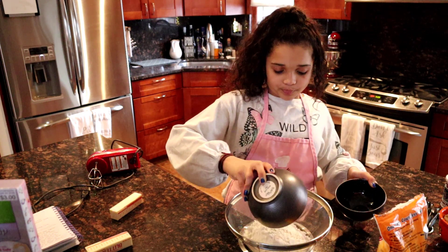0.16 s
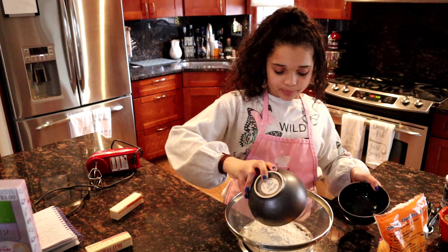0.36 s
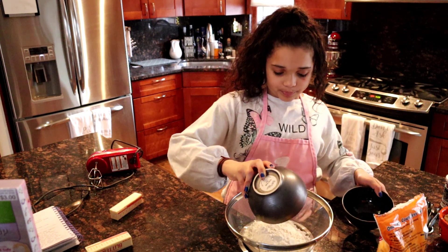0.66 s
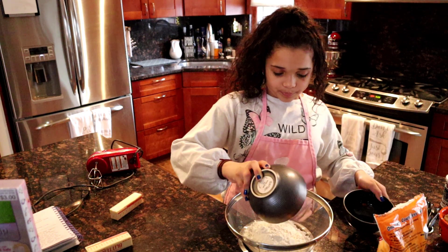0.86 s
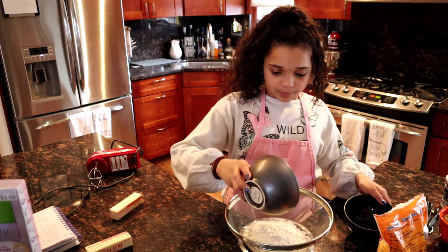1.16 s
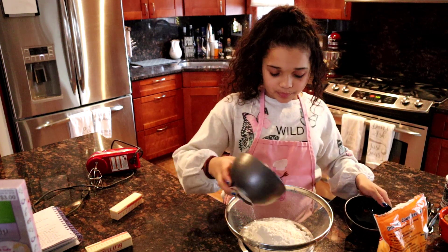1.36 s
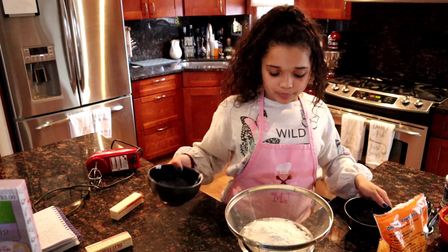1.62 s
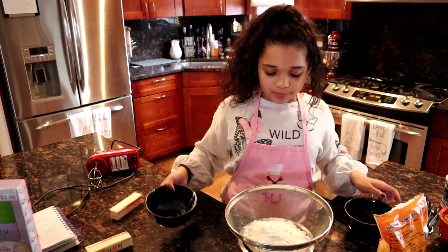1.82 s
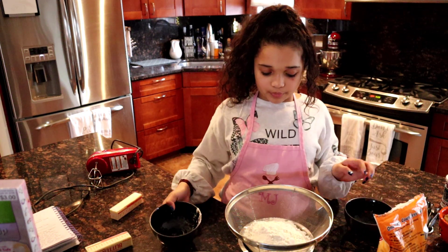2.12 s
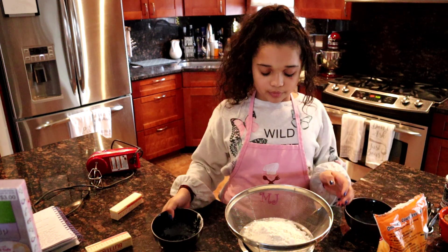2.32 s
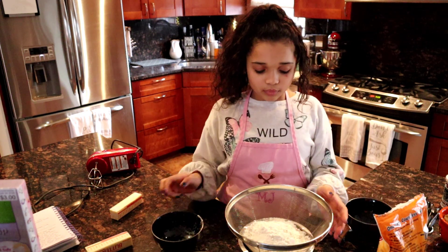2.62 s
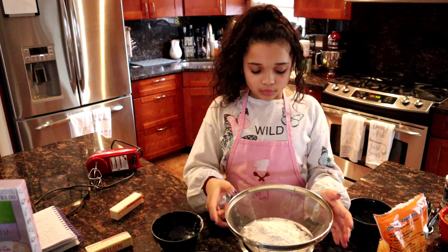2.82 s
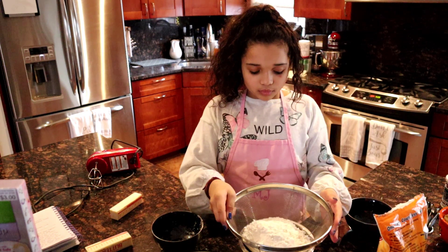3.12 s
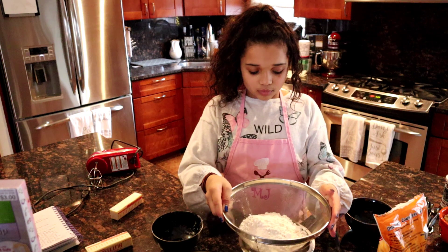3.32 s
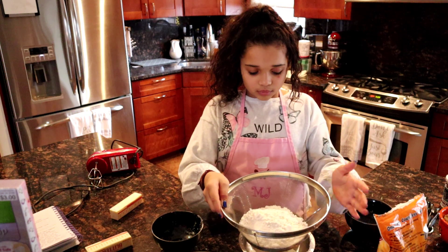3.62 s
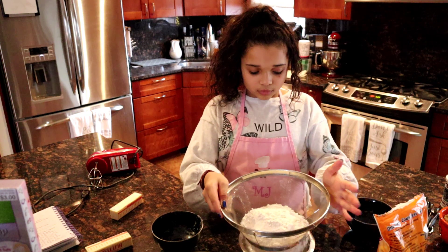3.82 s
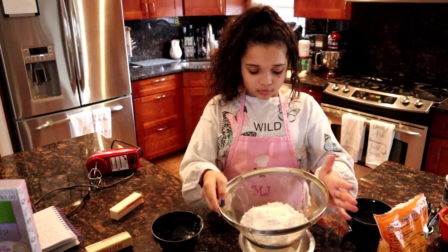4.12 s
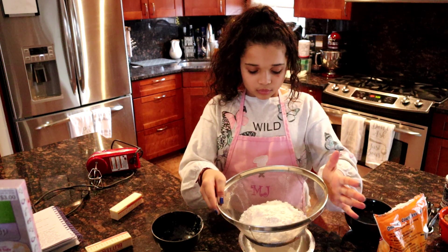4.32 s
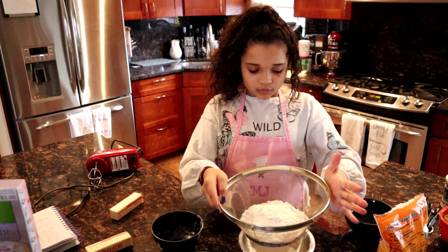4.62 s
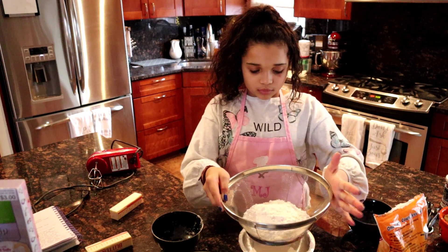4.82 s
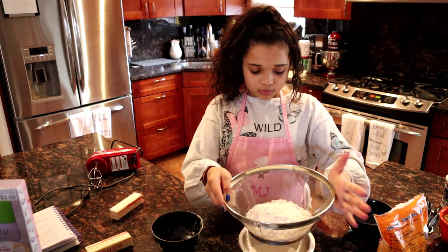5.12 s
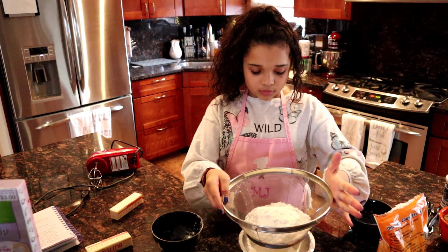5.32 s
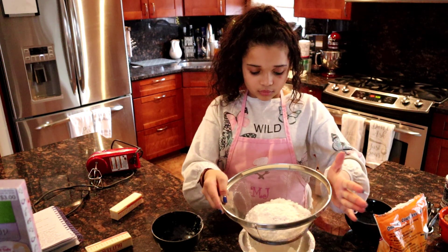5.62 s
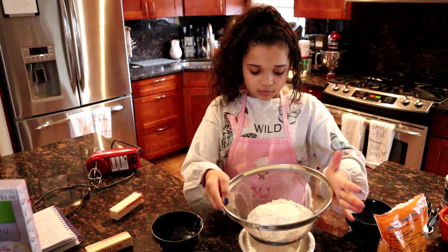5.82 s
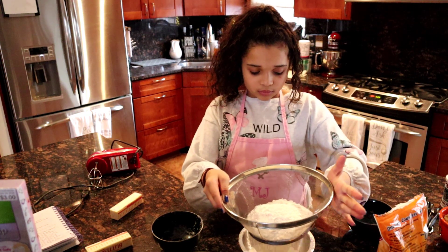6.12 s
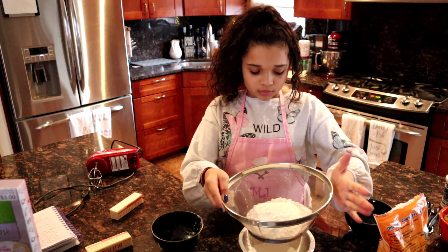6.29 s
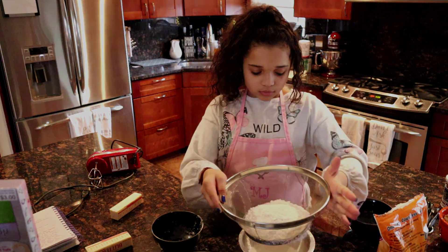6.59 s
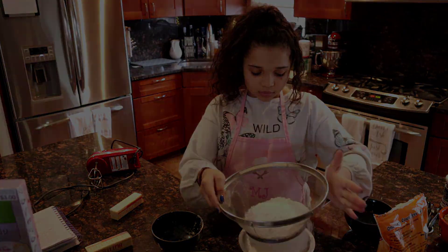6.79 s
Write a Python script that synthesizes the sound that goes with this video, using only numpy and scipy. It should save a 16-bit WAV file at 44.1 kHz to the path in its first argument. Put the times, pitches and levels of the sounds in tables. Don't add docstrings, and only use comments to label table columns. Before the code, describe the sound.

Close single-microphone kitchen sound: steady low fridge hum and light hiss, a few tiny metal and glass touches, then loud, hard plastic bowl knocks on a stone counter in two groups, each bouncing to rest with short room echoes. A brief rub and a small steel ring lead into quiet, bright, irregular mesh ticks as a sieve is tapped, each swinging back with a second softer tick and shedding flour.

```python
import sys
import numpy as np
from scipy import signal
from scipy.fft import rfft, irfft, next_fast_len
from scipy.io import wavfile
from scipy.ndimage import map_coordinates

SR = 44100
rng = np.random.default_rng(int(sys.argv[2]) if len(sys.argv) > 2 else 0)


def gain_from_db(level_db):
    decades = np.asarray(level_db, float) / 20
    return 10 ** decades


def dump_mix(stems):
    frames = np.atleast_2d(stems).T
    limited = np.clip(frames, -1, 1)
    pcm = np.round(limited * 32767).astype(np.int16)
    wavfile.write(sys.argv[1], SR, pcm)


N = 306495


def unit(x):
    return x / np.sqrt(np.mean(x ** 2) + 1e-20)


def peak(x):
    return x / np.max(np.abs(x))


def along(points, hz):
    f, v = np.transpose(points)
    return np.interp(np.log(hz + 1), np.log(f + 1), v)


def filtered(x, response):
    m = next_fast_len(len(x) + 8192)
    return irfft(rfft(x, m) * response(np.fft.rfftfreq(m, 1 / SR)), m)[:len(x)]


def resonances(modes):
    def response(f):
        total = 0
        for k, (centre, width, db) in enumerate(modes):
            loss = 1j * f * width
            total = total + (-1) ** k * gain_from_db(db) * loss / (centre * centre - f * f + loss)
        return total
    return response


def ring(modes, t, scatter_db):
    total = 0
    for hz, db, t60 in modes:
        envelope = gain_from_db(db + scatter_db * rng.normal() - 60 * t / t60)
        onset = 1 - np.exp(-t / .0004)
        total = total + envelope * onset * np.sin(2 * np.pi * hz * t)
    return total


def burst(t, t60):
    return gain_from_db(-60 * t / t60) * rng.standard_normal(len(t))


def add(track, s, x):
    part = track[round(s * SR):][:len(x)]
    part += x[:len(part)]


# f/Hz, t60/s
ROOM_DECAY = [(200, 0.4), (1000, 0.37), (1900, 0.32), (3300, 0.3), (5000, 0.22), (8000, 0.28),
              (14000, 0.077)]
# f/Hz, level/dB
TAIL_COLOUR = [(1100, -2), (2200, -5), (6000, -2)]


def kitchen(x, wet_db, walls=()):
    hz, t, z = signal.stft(rng.standard_normal(SR // 2), SR, nperseg=256)
    decay_db = along(TAIL_COLOUR, hz)[:, None] - 60 * t / along(ROOM_DECAY, hz)[:, None]
    tail = signal.istft(z * gain_from_db(decay_db), SR, nperseg=256)[1]
    tail *= 1 - np.exp(-(np.arange(len(tail)) / (.007 * SR)) ** 2)
    tail = gain_from_db(wet_db - 1) * tail / np.linalg.norm(tail)
    echoes = np.zeros(len(tail))
    for s, db in walls:
        echoes[round(s * SR)] = gain_from_db(db)
    answer = tail + filtered(echoes, lambda f: 1 / (1 + 1j * f / 2050) ** 2)
    answer[0] = 1
    return signal.fftconvolve(x, answer)


# t/s, level/dB
HUM = [(0.0, -55), (1.3, -51.5), (2.19, -50), (2.6, -53), (4.35, -52), (5.32, -54), (5.77, -60),
       (6.39, -55.5), (6.95, -52.5)]
# f/Hz, width/Hz, level/dB
MOTOR = [(94, 14, 0.5), (138, 20, -7.5), (226.7, 55, -10), (280, 42, -11.5), (359, 12, -7.5),
         (1050, 49, -18)]
# f/Hz, level/dB
AIR = [(12, -52.5), (20, -19.5), (98, -4), (230, -13.5), (545, -20.5), (1250, -27), (2000, -30.5),
       (15600, -36)]


def room_tone():
    sway_db = map_coordinates(rng.standard_normal(60), [np.arange(N) * 7 / SR])
    load_db = np.interp(np.arange(N) / SR, *np.transpose(HUM))
    motor = unit(filtered(rng.standard_normal(N), lambda f: np.abs(resonances(MOTOR)(f)) ** 1.5))
    air = unit(filtered(rng.standard_normal(N), lambda f: gain_from_db(along(AIR, f)) * (f < 15700)))
    return gain_from_db(load_db - 2.5 + sway_db) * motor + gain_from_db(-54) * air


# t/s, peak level/dB, dull part
# level/dB
LOOSE_TICKS = [(0.3732, -38, -5.5), (1.5347, -57.5, 20), (3.3623, -33, -13), (3.4064, -51.5, 8.5),
               (3.8766, -41.5, -2.5), (4.8329, -49, -1), (4.8569, -50, -13), (4.865, -48, -6),
               (2.225, -56.5, 6.5), (5.215, -47, -4), (5.183, -53, 10), (5.232, -45.5, -10),
               (5.2683, -35, -10.5), (6.0033, -58, -7), (6.2352, -51.5, -10), (6.44, -53, 4), (3.2928, -36, -8),
               (3.3248, -44, -6), (5.9934, -60.5, 8), (6.8065, -37.5, -7), (6.8485, -48, -15)]
# t/s, peak level/dB, dull part level/dB, delay of the swing back t/s
TAPS = [(3.1804, -41, -6.5, .0344), (4.2203, -48.5, -1.5, .0364), (4.3798, -51.5, 5, .036),
        (4.5356, -47.5, -1, .0364), (4.6997, -47.5, -2.5, .03), (4.9535, -44, -2, .0395),
        (5.5822, -49.5, 0, .0444), (5.7485, -44.5, -4, .035), (5.9032, -41, -4.5, .034),
        (6.0706, -41.5, -7, 0.031), (6.493, -37.5, -2, .0355), (6.6568, -42.5, 6.5, .039)]
# f/Hz, width/Hz, level/dB
MESH = [(5680, 1300, -5.5), (6030, 1400, -2), (8600, 1800, 6.5)]


def sieve():
    out, t = np.zeros(N), np.arange(SR // 8) / SR
    ticks = [(s, db, dull_db, -14) for s, db, dull_db, _ in TAPS]
    for s, db, _, after in TAPS:
        back_db = -48 + 0.88 * (db + 46)
        ticks.append((s + after, back_db, -15.5, -10.5))
    ticks += [(s, db, dull_db, -11.5) for s, db, dull_db in LOOSE_TICKS]
    for s, db, dull_db, bright_db in ticks:
        rattle = np.exp(-(t / 0.0053) ** 2) * rng.standard_normal(len(t))
        shake = rattle + gain_from_db(-14.5) * burst(t, 0.24)
        mesh = peak(filtered(shake, lambda f: resonances(MESH)(f) * f / (f + 5000)))
        dull = peak(filtered(shake, resonances([(1504, 1400, -6.0), (4033, 4900, -3)])))
        bright = peak(filtered(shake, lambda f: resonances([(12800, 2800, 0)])(f) ** 2))
        bright_db = bright_db + 0.46 * (db + 45)
        tick = mesh + gain_from_db(dull_db + 1.0) * dull + gain_from_db(bright_db) * bright
        add(out, s, gain_from_db(db + 0.5) * kitchen(tick, wet_db=-10))
    return out


# t/s, peak level/dB, f/Hz, t60/s
BUMPS = [(.376, -47.5, 890, .03), (1.315, -60, 8750, 0.024), (.878, -47, 710, 0.029),
         (1.796, -40, 750, 0.12), (3.045, -68, 6500, 0.29), (3.05, -68, 12270, .2), (4.06, -53, 745, 0.09),
         (5.14, -53, 720, 0.094), (1.4, -52.5, 6130, .04), (.573, -57, 7050, .05), (.634, -58.5, 7100, .04),
         (5.184, -44.5, 820, 0.04), (5.75, -58, 2850, 0.042), (5.904, -56, 2966, .03)]


def bumps():
    out, t = np.zeros(N), np.arange(SR // 2) / SR
    for s, db, hz, t60 in BUMPS:
        pair = [(hz, db, t60), (hz + 90, db - 0.5, 0.48 * t60)]
        add(out, s, kitchen(ring(pair, t, 1.2), wet_db=-8.5))
    return out


# t/s, peak level/dB, low modes level/dB
GLASS_HITS = [
    (0.3995, -58.5, -15),
    (0.4379, -67.5, -10),
    (0.4716, -54.5, -20),
    (0.5303, -61.5, -12),
    (0.6335, -60, -20),
    (0.6878, -53, -22),
    (1.122, -64.5, -1.5),
    (1.9849, -33.5, -2),
]
# f/Hz, level/dB, t60/s
GLASS = [(1064, -18, .7), (1072.4, -16.5, .7), (2611, -13, .36), (4600, -9.5, 0.17), (7014, -14, .05),
         (9600, -18.5, 0.058), (11400, -25, 0.053), (13000, -24, 0.042)]


def glass_bowl():
    out, t = np.zeros(N), np.arange(SR // 2) / SR
    for s, db, low_db in GLASS_HITS:
        modes = [(hz, level + low_db * (hz < 3000), t60) for hz, level, t60 in GLASS]
        chink = ring(modes, t, .8) + 0.47 * burst(t, .004)
        add(out, s, gain_from_db(db + 6.0) * kitchen(chink, wet_db=-13.5))
    return out


def dragged_rim():
    drag = filtered(rng.standard_normal(N), resonances([(8790, 60, -1.0), (3750, 30, -3)]))
    since = np.maximum(np.arange(N) / SR - .7, 0)
    stroke = (1 - np.exp(-since / .04)) * np.exp(-(since / .22) ** 2)
    return gain_from_db(-66) * stroke * unit(drag)


# t/s, peak level/dB, then relative level/dB of upper body, crack, rim ring
FIRST = [
    (1.326, -6.5, -7.5, -24.5, -24.5),
    (1.401, -9, -4, -35.5, -31),
    (1.437, -15.5, -8, -49.5, -25.5),
]
LANDING = [
    (1.8118, -5.5, 2, -15.5, -8.5),
]
SECOND = [
    (2.398, -4.5, -1.5, -25.5, -25),
    (2.4578, -6, -5, -26.5, -22.5),
    (2.482, -6.5, -5.5, -29, -28.5),
    (2.4958, -8, -7, -26, -32),
]
SETTLING = [
    (2.5786, -4, 1.83, -7.5, -17),
]
# f/Hz, width/Hz, level/dB
BODY_LOW = [(234, 240, -11.5), (420, 76, -6.5), (617, 120, -6), (767, 90, 1.5), (880, 81, 1.5),
            (1045.5, 160, 1), (1451, 150, -3)]
BODY_HIGH = [(1603, 49, -5.5), (1810, 180, -2.5), (2065, 240, 0.5), (2810, 270, -6), (2910, 200, -5)]
# f/Hz, width/Hz, level/dB
OTHER_LOW = [(227, 300, -16), (421, 110, -8), (540, 85, -7.5), (776, 100, 0), (940, 41, -1), (1033, 74, 2),
             (1339, 230, -2.5)]
OTHER_HIGH = [(1578, 82, -0.5), (1890, 160, 2), (2197, 250, 0.5), (2700, 340, -4.5), (3260, 400, -6.5)]
# f/Hz, width/Hz, level/dB
CRACK = [(3690, 1800, 6), (5870, 2200, -1.5), (9030, 4900, -15.5), (12940, 2700, -13)]
# f/Hz, level/dB, t60/s
RIM_LOW = [(7170, 0, .06), (7235, -5, .06), (5920, -8, .03)]
RIM_FIRST = [(8790, 0, .04), (8850, -6, .07), (10550, -20, .03), (11270, -15, .03), (11920, -20, .03),
             (13750, -16, .02), (15300, -22, .03)]
RIM_SECOND = [(8880, -3, .05), (8995, 0, .06), (11300, -14, .02), (12120, -19, .03), (13720, -16, .025)]
# f/Hz, level/dB, t60/s
SHELL = [(800.5, -7, 0.2), (940, 0, .28), (1023, 2, .3), (1100, -4.5, .3), (1317, -4.5, .22),
         (2055, -3.5, 0.14), (2100, -7.5, 0.19)]
# t/s, level/dB
WALLS_LEFT = [(.0035, -2), (.0098, -10.5), (.013, -4.5)]
WALLS_FRONT = [(.0035, -9), (.007, -9.5), (0.016, -6)]
WALLS_RIGHT = [(.004, -4.5), (0.0121, -3), (0.018, -15.5)]


def bowl(knocks, low_modes, high_modes, rim, walls, thud_db, wet_db, soft_hz, low_rim_db):
    out, t = np.zeros(N), np.arange(SR // 8) / SR
    long = np.arange(SR // 2) / SR
    push = np.sin(np.pi * np.minimum(t / 0.00021, 1)) ** 2
    thud = peak(filtered(push, resonances(low_modes[:2])))
    lower = peak(filtered(push, resonances(low_modes[2:])))
    upper = peak(filtered(push, lambda f: resonances(high_modes)(f) * 1j * f / (1j * f + 900)))

    def soft(f):
        return 1 / (1 - (f / soft_hz) ** 2 + 1.05j * f / soft_hz) ** 3

    def crack_response(f):
        return resonances(CRACK)(f) * (1j * f / (1j * f + 2500)) ** 2

    for s, db, upper_db, crack_db, rim_db in knocks:
        body = filtered(gain_from_db(thud_db) * thud + lower + gain_from_db(upper_db) * upper, soft)
        crack = peak(filtered(burst(t, 0.0094), crack_response))
        rims = gain_from_db(low_rim_db) * ring(RIM_LOW, t, 1.9) + gain_from_db(-2) * ring(rim, t, 1.55)
        add(out, s, gain_from_db(db - 0.43) * kitchen(body + gain_from_db(crack_db + 10) * crack, wet_db, walls))
        add(out, s, gain_from_db(db - 18.5) * ring(SHELL, long, 2.2))
        add(out, s, gain_from_db(db + 3.5) * kitchen(gain_from_db(rim_db) * rims, wet_db - 4.0))
    return out


# t/s, rise t/s, t60/s, f/Hz, level/dB
RUBS = [
    (3.088, .0005, 0.18, 1570, -51),
    (3.089, .001, 1.1, 2060, -58.5),
    (3.12, .05, .5, 8500, -58),
    (6.2, 0.1, 1.3, 2000, -59),
    (7.7, 0.031, .5, 7700, -60),
    (4.96, 0.0093, .4, 6500, -65),
]


def rubs():
    out, t = np.zeros(N), np.arange(SR // 2) / SR
    for s, rise, t60, hz, db in RUBS:
        response = resonances([(hz, 0.35 * hz, 0)])
        rub = unit(filtered(rng.standard_normal(len(t)), lambda f: response(f) ** 2))
        envelope = gain_from_db(db - 60 * t / t60) * (1 - np.exp(-t / rise)) * np.cos(np.pi * t)
        add(out, s, envelope * rub)
    return out


# t/s, level/dB
STEEL_HIT = (3.405, -50.5)
# f/Hz, level/dB, t60/s
STEEL = [(576, -3, .4), (1039, -4, .33), (1815, -9, .5), (1850, -10, .5), (2130, -10, .2), (3140, -5, .4),
         (3185, -4, .35), (3402, -7, .4), (3700, -14, .4), (4161, -9, .3), (4511, -6, .25)]


def steel_frame():
    out, t = np.zeros(N), np.arange(SR // 2) / SR
    s, db = STEEL_HIT
    add(out, s, gain_from_db(db) * kitchen(ring(STEEL, t, 0.46), wet_db=-9.0))
    return out


def scene():
    mix = room_tone() + sieve() + bumps() + glass_bowl() + dragged_rim()
    mix += bowl(FIRST, BODY_LOW, BODY_HIGH, RIM_FIRST, WALLS_LEFT,
                thud_db=-12.5, wet_db=-4.5, soft_hz=3000, low_rim_db=-8.0)
    mix += bowl(LANDING, BODY_LOW, BODY_HIGH, RIM_FIRST, WALLS_FRONT,
                thud_db=-13.5, wet_db=-4.0, soft_hz=4500, low_rim_db=-11.0)
    mix += bowl(SECOND, OTHER_LOW, OTHER_HIGH, RIM_SECOND, WALLS_RIGHT,
                thud_db=-11.0, wet_db=-5, soft_hz=3500, low_rim_db=-3.0)
    mix += bowl(SETTLING, OTHER_LOW, OTHER_HIGH, RIM_SECOND, WALLS_RIGHT,
                thud_db=-13.5, wet_db=-4.0, soft_hz=5040, low_rim_db=-42.5)
    mix += rubs() + steel_frame()
    return mix[None]


def low_pass(x):
    return signal.sosfilt(signal.butter(12, 16810, fs=SR, output="sos"), x)


def record(dry):
    t = np.arange(SR) / SR
    loudness = signal.fftconvolve(np.abs(dry[0]), np.exp(-t / 0.26) / (.3 * SR))[:N]
    x = dry / (1 + 12 * np.abs(loudness))
    x = x / (1 + np.abs(x / .85) ** 5) ** (1 / 5)
    x = filtered(x[0], lambda f: 1 / (1 + (f / 15800) ** 90))[None]
    return low_pass(x)


dry = scene()
out = record(dry)
dump_mix(out)
```